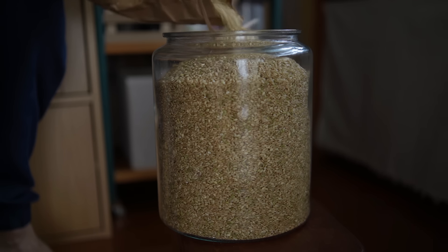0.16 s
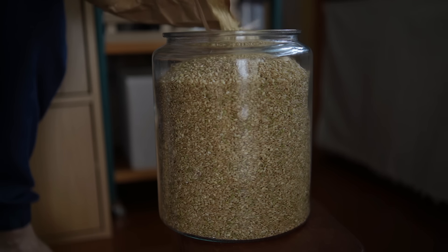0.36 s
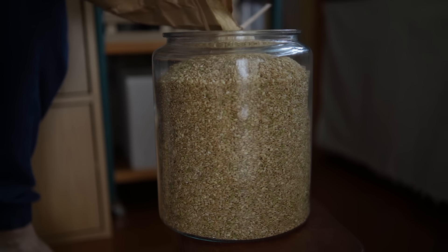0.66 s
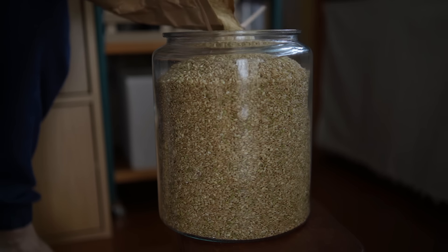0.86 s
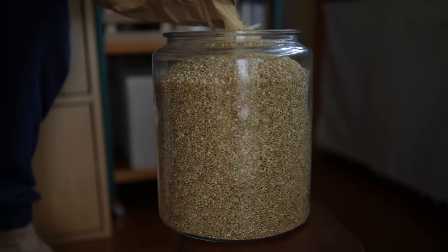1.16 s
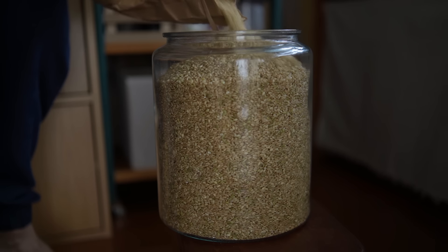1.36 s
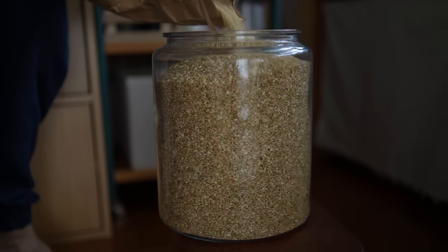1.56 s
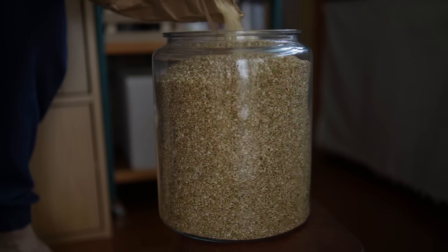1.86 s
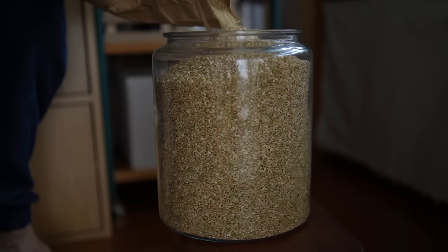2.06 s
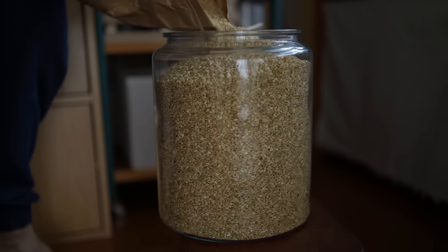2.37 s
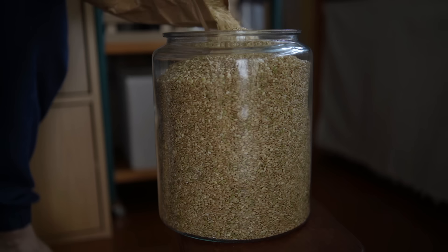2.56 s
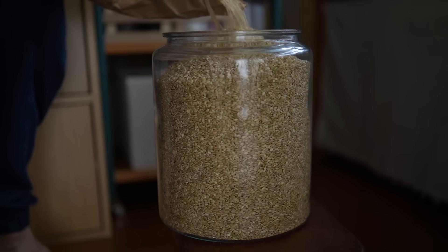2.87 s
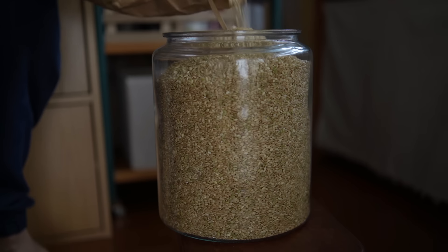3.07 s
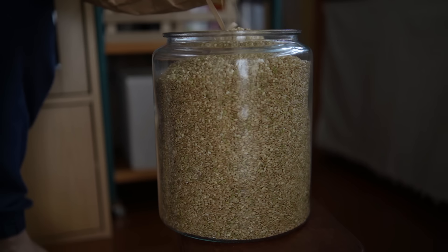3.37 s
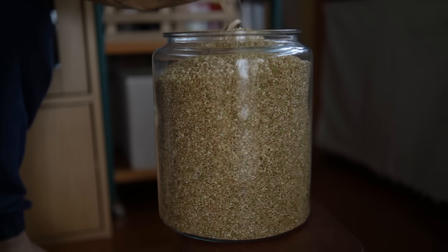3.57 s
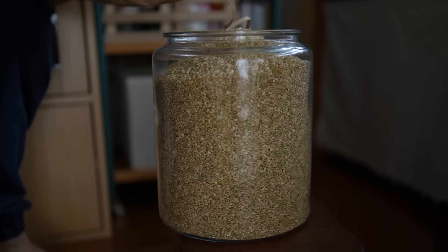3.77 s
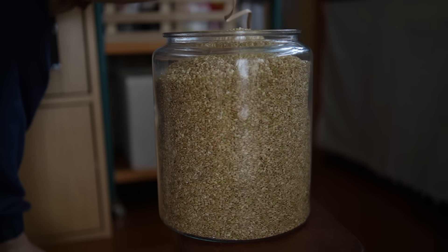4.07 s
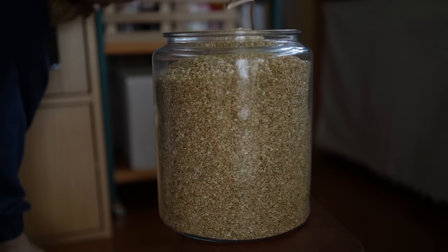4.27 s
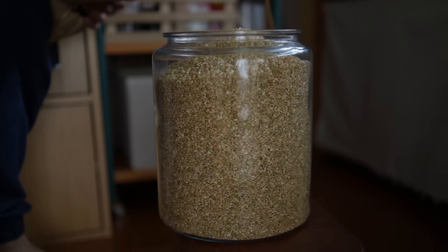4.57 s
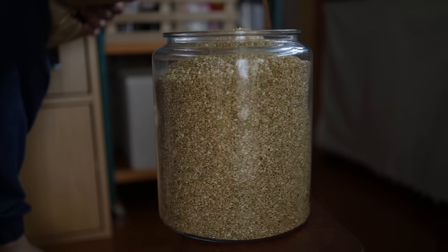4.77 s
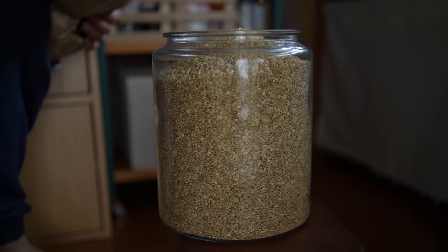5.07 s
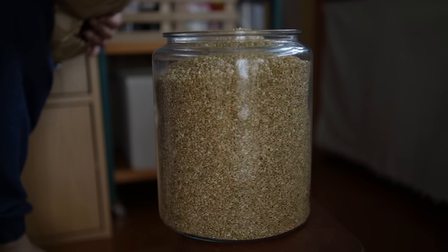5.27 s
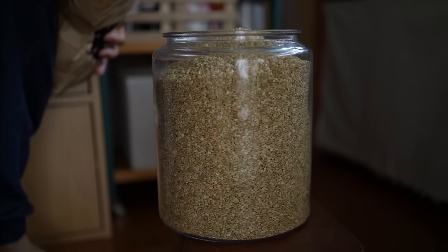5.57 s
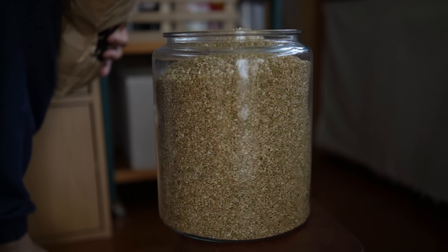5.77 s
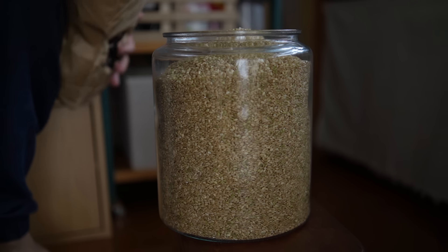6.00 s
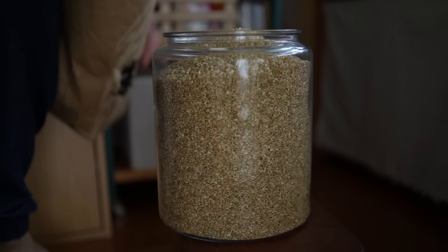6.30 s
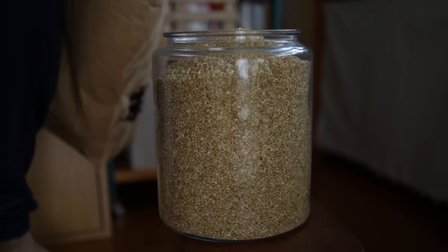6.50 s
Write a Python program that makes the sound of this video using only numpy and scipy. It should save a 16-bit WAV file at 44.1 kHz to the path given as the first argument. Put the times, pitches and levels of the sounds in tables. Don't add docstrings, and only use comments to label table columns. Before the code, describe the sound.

A quiet room with a faint low hum-like tone, heard by one close microphone. From 0 s dry grain pours from a paper bag onto the heap in a nearly full glass jar, a soft, fine hiss with a grainy mid-high patter and small surges; a crisp paper tick falls near 0.2 s. The stream swells at about 0.9-1.3 s with a couple of creases, then thins from 1.7 s to a weak, uneven trickle, with scattered tiny clicks and light paper pops until about 4 s. From 4.3 s the bag is lifted away: paper rustles, and sharp cracks come at 4.55 and 4.8 s. From 5 s it grows much louder, with dense crumpling, bright snaps around 5.35-5.6 s, hollow pops and low booms, strongest about 5.8-6.3 s. Loose grain slides and hisses inside the bag, still rustling when it ends at 6.6 s.

```python
import sys
import numpy as np
from scipy import signal
from scipy.fft import rfft, irfft, next_fast_len
from scipy.io import wavfile
from scipy.ndimage import uniform_filter1d, map_coordinates

SR = 44100
rng = np.random.default_rng(int(sys.argv[2]) if len(sys.argv) > 2 else 0)


def generate_wav(signal):
    frames = np.transpose(np.atleast_2d(signal))
    scaled = np.clip(frames, -1, 1) * 32767
    pcm = np.round(scaled).astype(np.int16)
    wavfile.write(sys.argv[1], SR, pcm)


def voltage_ratio(decibels):
    exponent = np.asarray(decibels, float) / 20
    return 10 ** exponent


N = 292824
SUDDEN_S = .005


def unit(x):
    return x / np.sqrt(np.mean(x ** 2) + 1e-20)


def along(points, hz):
    f, v = np.transpose(points)
    return np.interp(np.log(hz + 1), np.log(f + 1), v)


def curves(rows):
    s, *cols = np.transpose(rows)
    return [np.interp(np.arange(N) / SR, s, c) for c in cols]


def wobble(rate):
    knots = rng.standard_normal(int(N * rate / SR) + 4)
    return map_coordinates(knots, [np.arange(N) * rate / SR])


def filtered(x, response):
    m = next_fast_len(N + SR // 2)
    return irfft(rfft(x, m) * response(np.fft.rfftfreq(m, 1 / SR)), m)[:N]


def coloured(x, spectrum):
    z = rfft(x)
    flat = z / np.sqrt(np.abs(uniform_filter1d(np.abs(z) ** 2, size=1500)) + 1e-20)
    return unit(irfft(flat * voltage_ratio(along(spectrum, np.fft.rfftfreq(N, 1 / SR))), N))


def grains(count, hz, spread, turns, spike_db, size):
    when, pitch = rng.random(count), rng.standard_normal(count)
    force = np.minimum(rng.exponential(size=count), 3.8)
    f = np.clip(hz * np.exp(spread * pitch), 50, SR / 2.4)[:, None]
    k = np.arange(size)
    decay = np.exp(-f * k / SR / turns)
    ring = voltage_ratio(spike_db * force)[:, None] * np.sin(2 * np.pi * f * k / SR) * decay
    at = (when * N).astype(int)[:, None] + k
    return np.bincount(at.ravel(), ring.ravel(), N + size)[:N]


def diffuse(hits, wet_db):
    return coloured(hits, [(1, 0)]) + voltage_ratio(wet_db) * rng.standard_normal(N)


def swells(rows, steady_db, colour):
    s, db, rise, fall, tint_db = np.transpose(rows)[:, :, None]
    t = np.arange(0, N, 32) / SR
    before, after = (s - t) / np.maximum(rise, .003), (t - s) / np.maximum(fall, .01)
    away = np.where(t < s, before, after)
    power = np.sum(voltage_ratio(2 * (db + colour * tint_db - 20 * away)), axis=0)
    return np.sqrt(np.interp(np.arange(N) / SR, t, power) + voltage_ratio(2 * steady_db))


# frequency in Hz, level in dB per Hz.
ROOM_TONE = [(15, -39), (25, -2), (96, 5.5), (255, -8), (334, 0.5), (726, -3), (790, -26), (1400, -1),
             (1820, -37), (3080, -120)]


def room_tone():
    return voltage_ratio(-68.5) * coloured(rng.standard_normal(N), ROOM_TONE)


# time in seconds, flow in dB, brightness in dB.
FLOW_CURVE = [(0, -46, 2.5), (.35, -50, 5.5), (.8, -49, 4), (.97, -44.5, -1.5), (1.15, -43.5, 2),
              (1.45, -46, 6), (1.75, -54, 8.5), (2.4, -55, 3), (2.65, -54, 4), (2.95, -53, 7),
              (3.2, -54.5, 7), (3.3, -59, 4.5), (3.65, -52, 8.5), (3.85, -54.5, 7.5), (4.0, -57.5, 5.5),
              (4.2, -51, 4.5), (5.1, -65, 4), (5.25, -68, 2)]
# peak time in seconds, peak in dB, seconds to rise or fall 20 dB,
# brightness in dB.
STREAM_LUMPS = [(.08, -45, 0.03, 6.5), (.2, -45, 0.07, 8), (.415, -51.5, 0, 3), (.49, -59, 0.2, 2),
                (.56, -49.5, 0.07, 9), (.705, -43.5, 0.1, -3), (.79, -47.5, 0.05, 4), (.9, -40.5, 0.03, 1),
                (1.015, -39.5, 0.08, 6), (1.07, -38, 0.09, -20), (1.13, -42, 0.1, 5.5), (1.28, -44, 0, 13),
                (1.79, -50.5, -0.37, 6), (1.93, -58.5, 0.2, 12), (2.17, -56, 0.06, 6),
                (2.26, -52.5, 0.1, 4), (2.31, -55, -1.1, -8), (2.45, -48.5, -0.84, -15),
                (2.78, -53, -0.1, 4), (2.94, -48, -0.06, 5), (3.06, -49, 0, -3.5), (3.215, -52, -0.13, 0),
                (3.8, -54, 0.4, -2.5)]
# peak time in seconds, peak in dB, seconds to gain 20 dB,
# seconds to lose 20 dB, brightness in dB.
GRAIN_SLIDES = [(4.37, -49.5, 0.3, 1, -0.5), (4.43, -45.5, 0.08, 0.3, 2.5), (4.63, -38, 0, -0.28, -1),
                (4.95, -37.5, 0.12, 0.05, -0.5), (5.04, -38, 0.26, 0.06, -4.5), (5.331, -41, 0, 0.5, 3.5),
                (5.4, -37, -0.04, 0.3, 2.5), (5.46, -35, 0.01, 0.27, 7), (5.57, -36.5, -0.05, 0, 4),
                (5.701, -33.5, 0.07, 0.5, 2), (5.79, -29, 0.35, 0.37, -1.5), (5.87, -33, 0.08, 0.15, -5),
                (5.98, -32, 0.28, 0.27, -7.5), (6.07, -35.5, 0.16, 0.5, -12), (6.235, -29, 0.03, 0.7, 3.5),
                (6.33, -30, 0.36, 0.5, 7.5), (6.45, -30, 0.3, 0, 0.5), (6.62, -28, 0.2, 1, -4.5)]
# start in seconds, peak in dB, seconds to lose 20 dB,
# brightness in dB.
GRAIN_SPILLS = [(2.555, -53.5, 0.5, 0), (4.547, -41, 0.4, 3.5), (4.721, -36, 0.03, -19),
                (4.813, -43.5, 0.14, 9), (4.895, -43.5, 1.5, 3), (5.15, -34, 0, -12.5),
                (5.29, -41, 1.5, -5), (5.354, -27.5, -0.13, -10)]
# frequency in Hz, level in dB per Hz.
NECK_SPECTRUM = [(300, -58), (900, -20.5), (1450, -10), (1700, -2.5), (2150, -1), (2600, -3.5), (3100, -13),
                 (4500, -50)]
# frequency in Hz, level in dB per Hz.
PATTER_SPECTRUM = [(1800, -27), (2600, -7), (3100, -1.5), (3650, 1), (4300, -1), (4700, -5.5), (5400, -9),
                   (6000, -12), (7000, -24), (8200, -20.5), (10000, -30.5)]
# frequency in Hz, level in dB per Hz.
FIZZ_SPECTRUM = [(4000, -25.5), (5500, -15), (7000, -19), (8200, -25.5), (10000, -9), (12000, -3.5),
                 (13800, 0), (15000, 0), (15900, -9.5)]


def rice():
    flow_db, bright_db = curves(FLOW_CURVE)
    rushes = [(s, db, width, width, tint) for s, db, width, tint in STREAM_LUMPS] + GRAIN_SLIDES
    rushes += [(s, db, SUDDEN_S, fall, tint) for s, db, fall, tint in GRAIN_SPILLS]

    def gain(bright_share):
        return swells(rushes, flow_db + bright_share * bright_db, bright_share)

    hits = grains(count=30000, hz=5000, spread=.8, turns=2.2, spike_db=2.9, size=96)
    stream = diffuse(hits * voltage_ratio(0.39 * wobble(40) + 2.4 * wobble(130)), wet_db=4.5)
    neck = voltage_ratio(-0.83) * coloured(stream * voltage_ratio(0.6 * wobble(25)), NECK_SPECTRUM)
    patter = voltage_ratio(-1.3) * coloured(stream * voltage_ratio(0.58 * wobble(25)), PATTER_SPECTRUM)
    fizz = coloured(stream * voltage_ratio(1.4 * wobble(27)), FIZZ_SPECTRUM)
    return gain(0) * neck + gain(0.52) * patter + gain(1) * fizz


# peak time in seconds, rustle in dB, seconds to gain 20 dB,
# seconds to lose 20 dB, hollow tone in dB.
BAG_FLEXES = [(.75, -59.5, 0.2, .5, -1), (1.01, -50, 0, 0.44, -9), (2.85, -61, -0.45, 0, 9),
              (3.32, -68.5, -1.5, .2, 2.5), (3.76, -60.5, 0.1, 0.4, 3), (4.2, -53.5, 0.3, 2, -8),
              (4.42, -46.5, 0.22, 0.2, -3), (4.589, -40.5, 0.08, 0.16, 2.5), (4.83, -50, -0.2, 0.04, 8),
              (4.941, -41.5, 0.16, 0.3, -3), (5.06, -35.5, 0.15, -0.04, 3.5), (5.125, -48, 0.07, 0.05, 3),
              (5.57, -32.5, 0.09, 0.02, 0.5), (5.761, -30, 0.17, 1, -10.5), (5.87, -27, 0.04, 0.1, 0),
              (5.91, -28.5, 0, 0.12, 3.5), (6.04, -31, -0.02, 0.13, 0.5), (6.12, -31, -0.02, 0.36, -4.5),
              (6.239, -25.5, 0.17, 0.15, -2.5), (6.38, -30, 0.26, 0.7, -18), (6.519, -31.5, 0.3, 0.1, -5.5),
              (6.62, -33, 0.33, .2, -8)]
# start in seconds, rustle in dB, seconds to lose 20 dB,
# hollow tone in dB.
PAPER_GIVES = [(2.43, -61, 0.5, -12), (2.76, -62, 0, -8), (3.05, -56, 0.5, -4.5), (3.188, -59.5, 1, -7),
               (3.633, -51, 0.5, -5), (3.932, -56, 0.7, -5), (4.352, -52, 2, -16), (4.548, -38.5, 0.26, -1),
               (4.723, -37.5, 0.18, 0.5), (4.963, -34, 0, 6), (5.025, -29.5, 0.07, 2),
               (5.153, -29.5, -0.1, -13.5), (5.289, -38.5, 1, -4.5), (5.356, -31, 0.07, -19),
               (5.458, -35.5, 0.2, 3.5), (5.657, -34, -1.5, -6.5), (5.833, -24, 0.2, -16),
               (5.955, -25.5, 0.18, -0.5), (6.001, -26, .18, -1.5)]
# frequency in Hz, level in dB per Hz.
PAPER_SPECTRUM = [(250, -51), (480, -7.5), (680, -1), (900, -1.5), (1100, -3.5), (1400, -1.5), (2000, -6.5),
                  (4000, -42)]
# frequency in Hz, width in Hz, level in dB.
BAG_AIR_MODES = [(305.3, 58, -1), (428, 78, -1), (499, 91, -7)]
# frequency in Hz, level in dB per Hz.
BOOM_SPECTRUM = [(18, -59), (30, -45), (82, 0.5), (134, 7), (178, 4.5), (221, -0.5), (260, -1), (340, -11),
                 (570, -120)]
DRAG_DB, DRAG_GROWS, DRAG_HOLLOW_DB = -61, 1.06, -6.5
BOOM_DB, BOOM_GROWS, BOOM_LAG_S, STIR_DB = -43, 1.35, 0.029, -71.5


def bag_air(f):
    modes = sum((-1) ** k * voltage_ratio(db) * 1j * f * w / (c * c - f * f + 1j * f * w)
                for k, (c, w, db) in enumerate(BAG_AIR_MODES))
    return modes * f ** 4 / (f ** 4 + 230 ** 4)


def bag():
    moves = [(s, db, SUDDEN_S, fall, tint) for s, db, fall, tint in PAPER_GIVES] + BAG_FLEXES
    drag_db = DRAG_DB + DRAG_GROWS * (curves(FLOW_CURVE)[0] + 50)
    rustle = swells(moves, drag_db, 0)
    breath = swells(moves, drag_db + DRAG_HOLLOW_DB, 1)

    lagged = filtered(breath / voltage_ratio(-30.5), lambda f: 1 / (1 + 2j * np.pi * f * BOOM_LAG_S))
    pump = voltage_ratio(BOOM_DB) * np.abs(lagged) ** BOOM_GROWS
    boom = coloured(rng.standard_normal(N) * voltage_ratio(1.0 * wobble(16)), BOOM_SPECTRUM)

    small_buckles = grains(count=4000, hz=700, spread=.6, turns=4, spike_db=3, size=560)
    crinkle = diffuse(small_buckles * voltage_ratio(1.5 * wobble(30)), wet_db=-3)
    paper = voltage_ratio(-2.0) * coloured(crinkle, PAPER_SPECTRUM)
    hollow = voltage_ratio(-3.0) * unit(filtered(diffuse(crinkle, wet_db=-0.5), bag_air))
    return rustle * paper + breath * hollow + np.hypot(pump, voltage_ratio(STIR_DB)) * boom


# centre in Hz, width in Hz.
MOUTH_BANDS = [(600, 240), (2750, 470), (3700, 450), (5500, 1200)]
# time in seconds, then the gain of each of the four bands in dB.
MOUTH_MOVES = [(0, 2, -0.5, 0.5, 0.5), (.9, 0, 0.5, 0.5, 0.5), (1.4, 0.5, 0.5, -1, 0),
               (2.1, 1, 1.5, 1, 2.5), (2.5, -1.5, -0.5, -0.5, -3.5), (2.7, 1.5, 1.5, 2, 0),
               (2.95, 1.5, 2, 4, 1), (3.3, 0.5, -1.5, -1, 0.5), (3.6, 4, -6.5, 0, -3),
               (4.0, -0.5, -2, -2, -3), (4.3, -8, -6, -3, -3.5), (4.55, -2.5, 0, -1, 2.5),
               (4.9, -1.5, -1, 0, -2), (5.2, 0.5, -2.5, 0, -4), (5.45, 4.5, -1, -2.5, 1),
               (5.75, 0.5, -1, 2, 3), (6.1, 1, 0, 0.5, 0.5), (6.64, -0.5, -1, -0.5, -1)]
# frequency in Hz, width in Hz, gain in dB.
TAUT_FACES = [(311, 12, 2), (428, 10, 3), (683, 14, 1), (906, 13, 4), (1066, 16, 4), (1390, 11, 0),
              (1682, 18, 3.5), (1842, 19, 2), (2192, 10, 1.5), (2920, 18, 5.5), (3360, 22, 2),
              (3618, 16, 3)]


def mouth(x):
    for (hz, w), db in zip(MOUTH_BANDS, curves(MOUTH_MOVES)):
        x = x + (voltage_ratio(db) - 1) * filtered(x, lambda f: np.exp(-((f - hz) / w) ** 2))
    return filtered(x, lambda f: voltage_ratio(sum(db / (1 + (2 * (f - hz) / w) ** 2) for hz, w, db in TAUT_FACES)))


# start in seconds, peak in dB, body in dB, T60 in seconds.
CRISP_CREASES = [(0.184, -14.5, -14, 0.18), (1.078, -20, -7, 0.1), (1.1236, -18, -10, 0.1),
                 (1.8148, -18.5, -23.5, 0.03), (1.921, -19.5, -12, 0.085), (2.152, -26.5, -5, 0.15),
                 (2.2767, -32, -18, 0.12), (2.322, -26.5, -21, 0.19), (2.4628, -27, -7, 0.1),
                 (2.5466, -41, -12, 0.1), (2.922, -26.5, -15.5, 0.1), (3.214, -22.5, -9.5, 0.13),
                 (3.3757, -25.5, -19, 0.075), (4.0078, -28, -20, 0.1), (4.4205, -31, 3, 0.2),
                 (4.5458, -6, -17, 0.17), (4.718, -36, -3.5, 0.09), (4.811, -5.5, -22, 0.17),
                 (4.8934, -13.5, -22, 0.14), (5.0368, -19.5, -5, 0.13), (5.33, -18.5, -9, 0.11),
                 (5.374, -0.5, -17, 0.2), (5.419, -1.5, -21.5, 0.11), (5.5543, -15, -5.5, 0.1),
                 (5.5757, -2, -27, 0.18), (5.6945, -29, -5, 0.1), (6.0305, 0, -9, 0.022),
                 (6.105, -4, -28, 0.055)]
# start in seconds, peak in dB, body in dB, T60 in seconds.
LONE_CLICKS = [(.7826, -22, -15, .04), (1.775, -24, -8.5, .03), (1.785, -24, -7.5, .03),
               (1.857, -25, -13.5, .03), (1.94, -29, -20.5, .03), (2.048, -28.5, -14, .03),
               (2.107, -26, -7.5, .03), (2.428, -36, -2, .03), (4.4806, -23, -8, .05),
               (5.449, -8, -18, .04), (5.8893, -12, 0, .05), (5.9517, -20, -1, .05), (6.1773, -15, -8, .05)]
EDGE_DB, EDGE_HZ, EDGE_S = -26, 5500, 0.0066


def creases():
    crisp, body, edge = np.zeros((3, N + SR))
    t = np.arange(SR // 4) / SR
    for s, db, body_db, t60 in CRISP_CREASES + LONE_CLICKS:
        decay = voltage_ratio(-60 * t / 0.01) + 0.52 * voltage_ratio(-60 * t / max(t60, .005))
        crack = rng.standard_normal(len(t)) * decay * (1 - np.exp(-t / 0.00035))
        span = slice(round(s * SR), round(s * SR) + len(t))
        crisp[span] += voltage_ratio(db - 13.5) * crack
        body[span] += voltage_ratio(db + body_db - 5) * crack
        edge[span] += voltage_ratio(db + EDGE_DB + body_db / 2 - 60 * t / EDGE_S) * crack
    bright = filtered(crisp[:N], lambda f: voltage_ratio(along(FIZZ_SPECTRUM, f) + 2.0))
    front = filtered(edge[:N], lambda f: 1j * f * EDGE_HZ / (EDGE_HZ ** 2 - f * f + 1j * f * EDGE_HZ))
    dull = filtered(body[:N], lambda f: voltage_ratio(along(PATTER_SPECTRUM, f) + 4.0)
                    + voltage_ratio(along(NECK_SPECTRUM, f) + 3.0))
    return bright + front + dull


# start in seconds, peak in dB, pitch in Hz, decay in cycles.
POURING_TICKS = [(.7, -45, 2210, 4), (.897, -29, 2290, 4), (1.056, -32, 2270, 4), (1.076, -32, 1980, 3.7),
                 (2.428, -44, 2300, 4), (2.551, -36, 2410, 4), (2.757, -28, 1270, 9),
                 (3.048, -26.5, 3980, 4.5), (3.185, -34, 1290, 5.9), (3.218, -25.5, 3940, 4),
                 (3.63, -44, 810, 4.4), (3.672, -31, 1750, 4.8), (3.736, -33.5, 3500, 4),
                 (3.929, -41.5, 395, 2.8)]
# start in
# seconds, peak in dB, pitch in Hz, decay in cycles.
MORE_BUCKLES = [(2.757, -32, 2600, 2), (2.925, -32, 3700, 12), (2.946, -36.5, 2630, 13),
                (3.545, -32, 3300, 8), (4.14, -39, 1500, 8), (4.22, -39.5, 1200, 8), (4.266, -33, 3500, 8),
                (5.023, -20, 1300, 3), (5.1495, -25, 3500, 6), (5.288, -30, 1800, 4), (5.288, -31, 3600, 6),
                (5.341, -27, 3700, 5), (5.4575, -11, 1100, 1.6), (5.654, -21, 3800, 5),
                (5.3523, -16, 1600, 1.8), (3.186, -35, 1700, 3), (3.218, -33.5, 1510, 2),
                (4.719, -26, 1500, 3), (6.455, -16, 1700, 3), (6.495, -15, 2000, 3), (5.891, -13, 1500, 1.5),
                (5.953, -13, 1500, 2.2), (5.999, -16, 1300, 2), (6.041, -15, 1200, 1.5)]
# start in seconds, peak in dB, pitch in Hz, decay in cycles.
HAND_POPS = [(4.349, -29, 1730, 11), (4.374, -34, 1200, 13), (4.421, -22, 3240, 3.7),
             (4.46, -31, 1460, 8.2), (4.545, -26, 736, 6.4), (4.621, -16.5, 3500, 14),
             (4.701, -27.5, 387, 4.2), (4.719, -22, 455, 3.1), (4.81, -31, 3370, 4.6),
             (4.894, -35, 3360, 4), (4.96, -19, 463, 4.6), (5.022, -22, 510, 3.1), (5.088, -23, 860, 7.1),
             (5.116, -28.5, 319, 24), (5.149, -21.5, 2140, 6.7), (5.288, -34, 443, 3.2),
             (5.339, -42, 2190, 4), (5.353, -13.5, 945, 6.5), (5.457, -14, 697, 8.1),
             (5.536, -23, 520, 4.5), (5.654, -21, 860, 4.1), (5.829, -13.5, 1040, 9.4),
             (5.952, -18.5, 470, 14), (5.998, -18.5, 475, 12), (6.039, -17.5, 428, 5.5),
             (6.264, -14.5, 312, 2.6)]
# start in seconds, peak in dB, pitch in
# Hz, decay in cycles.
MORE_POPS = [(4.461, -38, 3300, 4), (4.925, -27, 1250, 5), (5.032, -23, 650, 9.7), (5.06, -25, 418, 4.1),
             (5.378, -22, 850, 4.6), (5.389, -22, 1900, 4.5), (5.42, -26, 795, 9.7), (5.467, -19, 3200, 4),
             (5.5, -22, 710, 5.7), (5.523, -17, 1300, 5), (5.563, -22, 1910, 6.4), (5.585, -25, 800, 6.4),
             (5.666, -21, 980, 4), (5.81, -16, 1880, 5), (5.853, -16, 740, 6.2), (5.862, -14, 2120, 14),
             (5.916, -17, 1700, 4), (6.015, -18, 690, 4.7), (6.204, -19.5, 754, 4.4),
             (6.232, -17, 690, 2.8)]
CRACKLE_DB, CRACKLE_DB_PER_OCTAVE = -10.5, -0.5


def buckles():
    pops = np.zeros(N + SR)
    t = np.arange(SR // 4) / SR
    for s, db, hz, turns in POURING_TICKS + HAND_POPS + MORE_POPS + MORE_BUCKLES:
        overtone_hz = hz * rng.uniform(1.39, 2.84)
        ring = np.sin(2 * np.pi * hz * t) + 0.18 * np.sin(2 * np.pi * overtone_hz * t)
        band = signal.butter(2, [hz * .65, min(hz * 3, 7000)], "bandpass", fs=SR)
        crack = np.diff(signal.lfilter(*band, rng.standard_normal(len(t) + 1)))
        ring += .7 * voltage_ratio(-60 * t / .01) * unit(crack)
        crackle_db = CRACKLE_DB + CRACKLE_DB_PER_OCTAVE * np.log2(hz / 500)
        crackle = unit(signal.lfilter(*band, rng.standard_normal(len(t))))
        settle = voltage_ratio(crackle_db - 60 * t / .1) * crackle
        decay = voltage_ratio(-30 * t * hz / max(turns, .5))
        pops[round(s * SR):][:len(t)] += voltage_ratio(db - 1.5) * (decay * ring + settle)

    def radiation(f):
        low = 1j * f / 260
        return low ** 2 / (1 + low + low ** 2)

    panels = filtered(pops[:N], radiation)
    return filtered(panels, lambda f: 1 / (1 + 1.4j * f / 4200 - (f / 4200) ** 2) ** 2)


# frequency in Hz, T60 in seconds.
ROOM_DECAY = [(200, 0.35), (1500, 0.67), (6000, 0.42), (15000, 0.38)]


def room(x, wet_db):
    out, step = np.pad(x, (0, SR)), SR // 8
    for a in range(0, N, step):
        hz, t, z = signal.stft(rng.standard_normal(SR // 2), SR, nperseg=256)
        decay = voltage_ratio(-60 * t / along(ROOM_DECAY, hz)[:, None])
        tail = signal.istft(z * decay, SR, nperseg=256)[1]
        wet = signal.fftconvolve(x[a:a + step], tail / np.linalg.norm(tail))
        out[a + 130:][:len(wet)] += voltage_ratio(wet_db) * wet
    return out[:N]


def scene():
    snaps = room(creases() + buckles(), wet_db=-6)
    return np.tile(mouth(rice() + bag()) + snaps + room_tone(), (2, 1))


# centre in seconds, low edge in Hz, high edge in Hz,
# level in dB.
SIDE_BURSTS = [(4.39, 6200, 7700, -69), (6.294, 4480, 5800, -36), (6.294, 7580, 9000, -47),
               (6.456, 4160, 5850, -34), (6.456, 12400, 13780, -30)]


def side_noise():
    t, out = np.arange(N) / SR, np.zeros(N)
    for s, low_hz, high_hz, db in SIDE_BURSTS:
        fade = np.cos(np.pi * np.clip((t - s) * SR / 2200, -.5, .5)) ** 2
        noise = filtered(rng.standard_normal(N), lambda f: (f > low_hz) & (f < high_hz))
        out += voltage_ratio(db) * fade * unit(noise)
    return np.outer([1, -1], out)


def low_pass(x):
    return signal.sosfilt(signal.butter(12, 16830, fs=SR, output="sos"), x)


# frequency in Hz, width in Hz, gain in dB.
CASE_BENDS = [(1390, 310, -1), (2690, 270, -2), (5130, 270, 1.5), (12100, 710, -3), (13600, 370, 0)]


def record(dry):
    dip_hz, floor_hz, skirt_hz, top_hz = 8270, 120, 900, 15870

    def response(f):
        dip = (dip_hz ** 2 - f * f + 1j * f * floor_hz) / (dip_hz ** 2 - f * f + 1j * f * skirt_hz)
        case = voltage_ratio(sum(db * np.exp(-((f - hz) / w) ** 2) for hz, w, db in CASE_BENDS))
        return dip * case * np.where(f < top_hz, 1, voltage_ratio(-48))

    heard = filtered(dry[0], response)
    return low_pass(heard + side_noise())


dry = scene()
out = record(dry)
generate_wav(out)
```